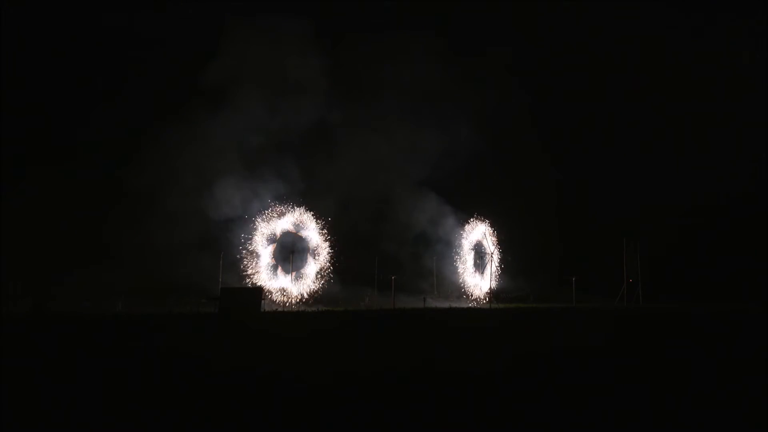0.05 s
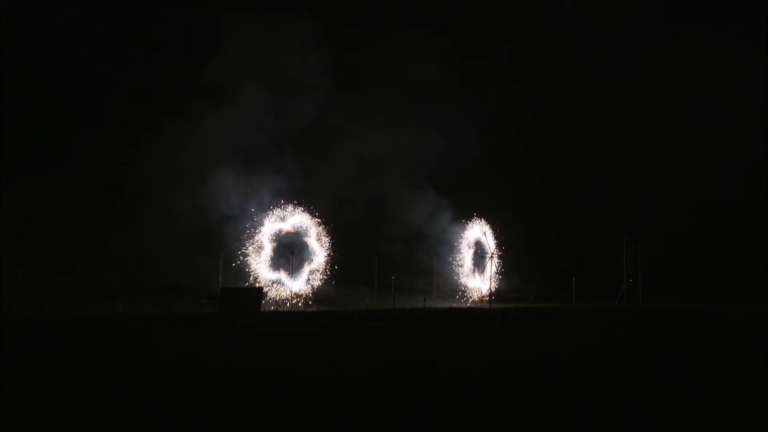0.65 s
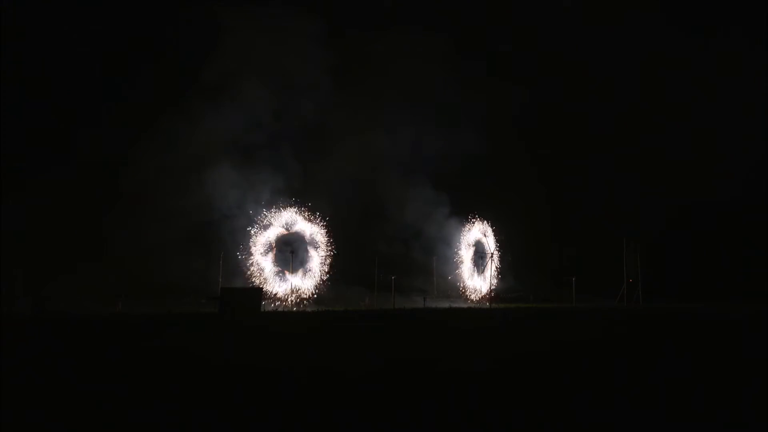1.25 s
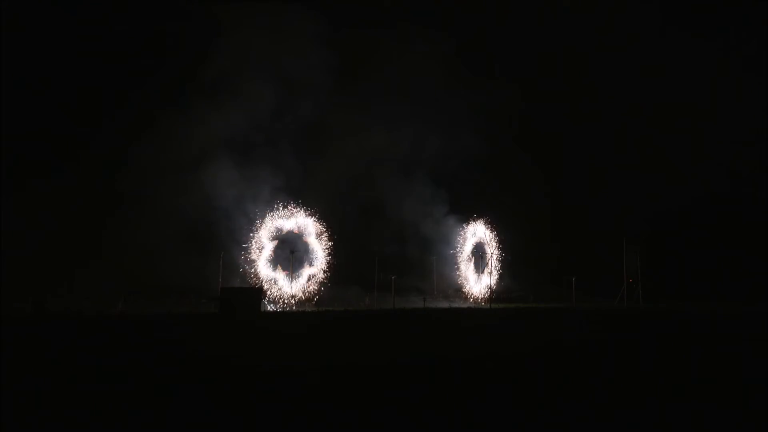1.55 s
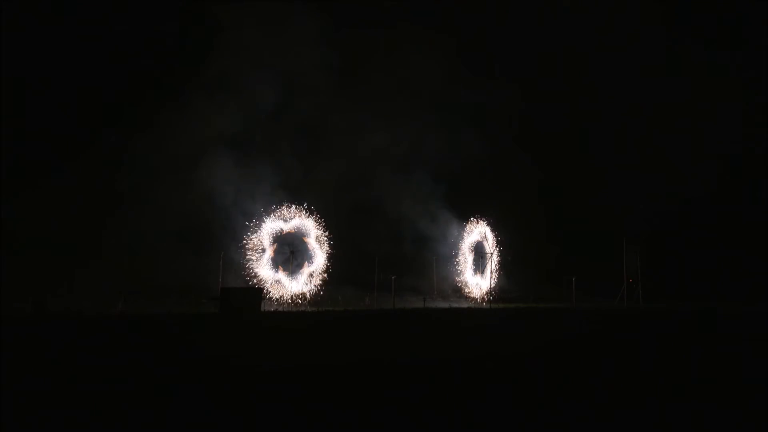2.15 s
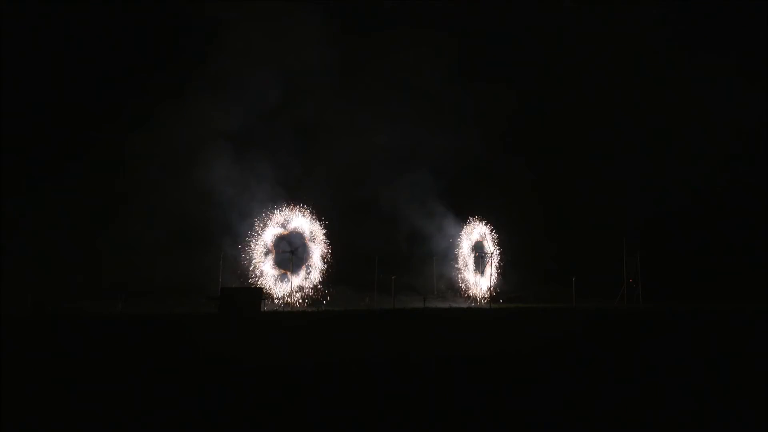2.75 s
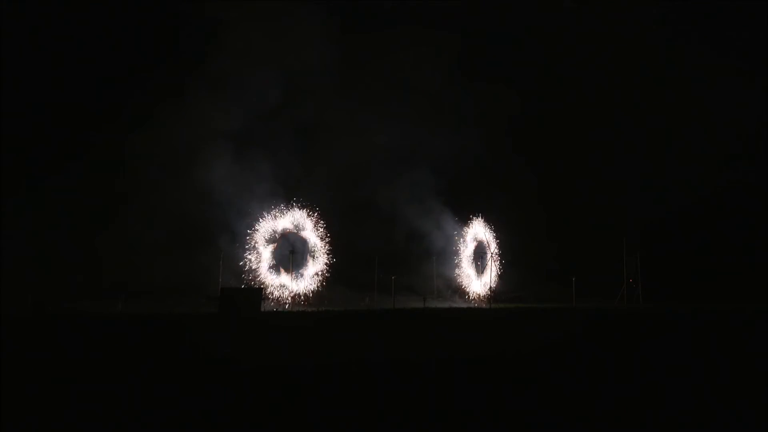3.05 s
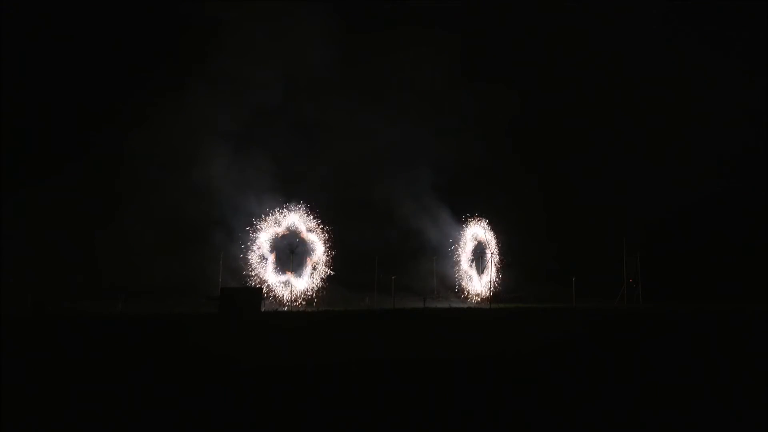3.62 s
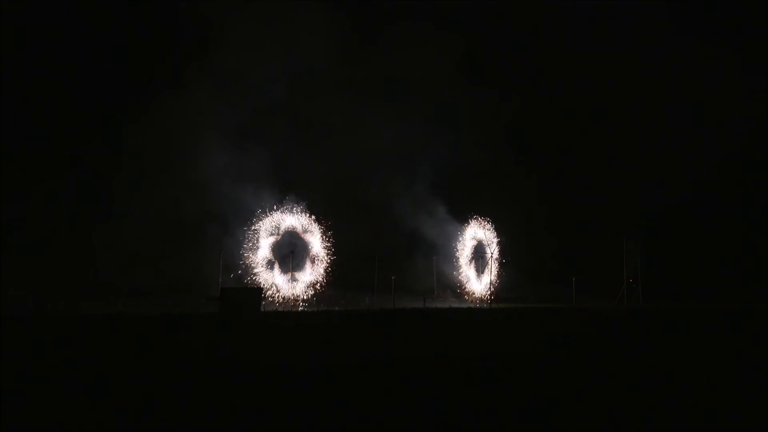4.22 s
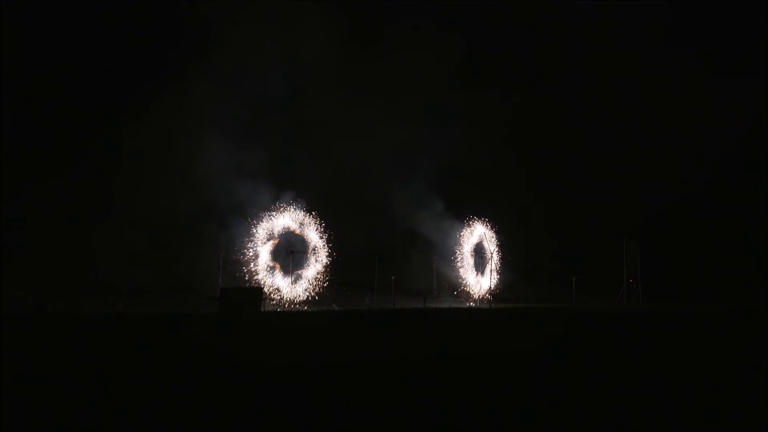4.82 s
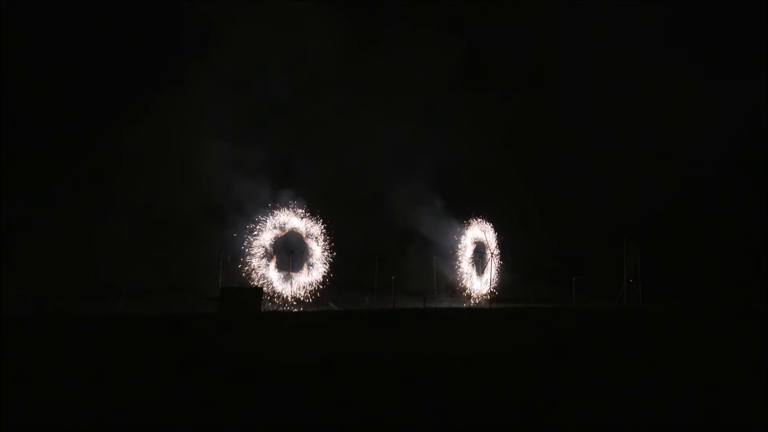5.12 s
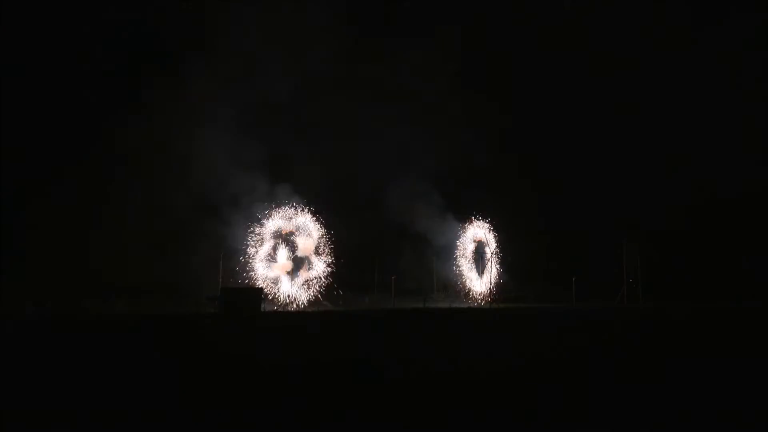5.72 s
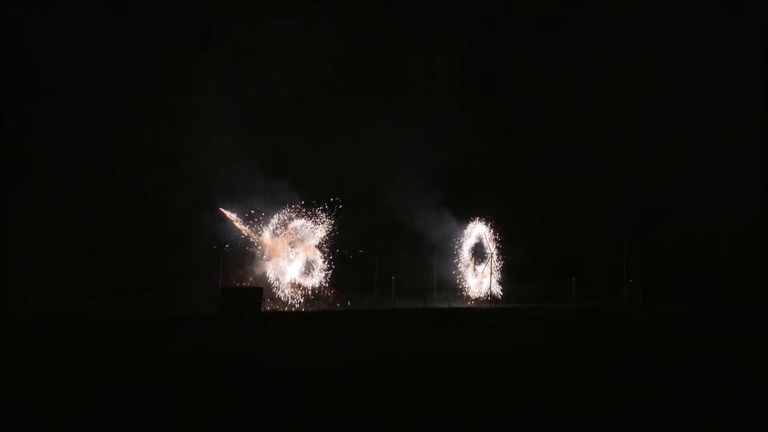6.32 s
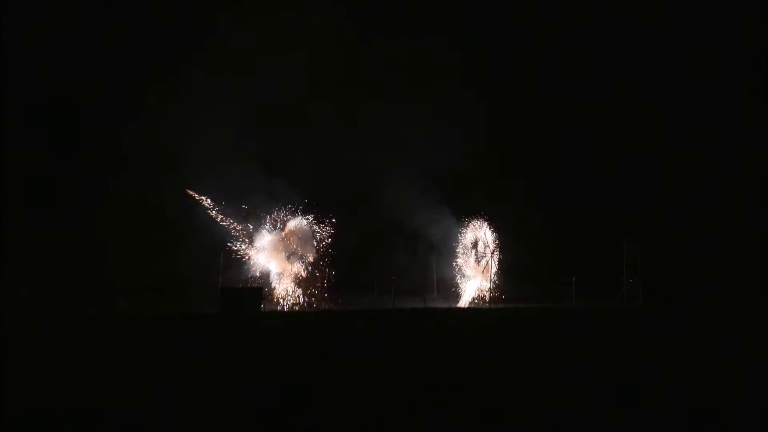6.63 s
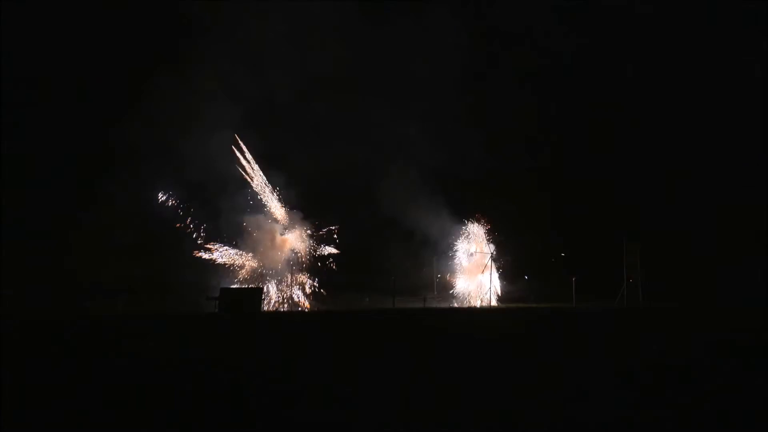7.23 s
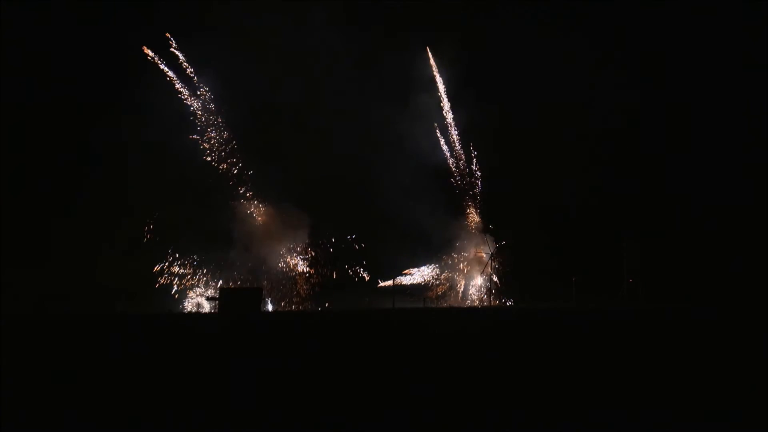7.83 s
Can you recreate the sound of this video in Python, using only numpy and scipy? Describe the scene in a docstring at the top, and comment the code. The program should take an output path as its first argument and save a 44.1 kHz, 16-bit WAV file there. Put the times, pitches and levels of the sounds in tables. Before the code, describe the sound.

Spinning firework wheels hiss and fizz with occasional sharp pops, then burst into a rapid run of loud, distorted bangs and cracks.

```python
"""In an open field at night, two firework wheels spin. Their gas jets hiss and fizz, with an odd sharp pop.
Then their charges go off: bangs, cracks, spurting comets and sputtering stars (burning pellets),
while the surroundings throw back a low rumble.
The bangs overload the single microphone, which feeds only the left channel."""
import sys
import numpy as np
from scipy import signal
from scipy.fft import rfft, irfft
from scipy.io import wavfile
from scipy.ndimage import uniform_filter1d

SR = 44100
rng = np.random.default_rng(int(sys.argv[2]) if len(sys.argv) > 2 else 0)


def transcribe(u):
    """Save the signal u as a 16-bit wav file named by the first command-line argument.

    u: samples, shape (n,) or (channels, n), limited to [-1, 1]; the rate is SR.
    q: integer samples, one column per channel.
    """
    v = np.clip(np.atleast_2d(u).T, -1, 1)
    q = np.round(v * 32767).astype(np.int16)
    wavfile.write(sys.argv[1], SR, q)


N = 347067
T = np.arange(N) / SR

# tone of rasping gas, also used for stars and scattered sound: (frequency [Hz], level [dB])
RASP_COLOUR = [(200, 1.5), (550, -9.5), (850, -5.5), (1300, -1.5), (1800, -1.5), (2900, -2.5),
               (4000, -10.5), (5800, -12.5), (8500, -23.5), (12000, -31.5), (15500, -75)]
# bursting charges: (time [s], blast level [dB], ring pitch [Hz], relative tearing level [dB],
# blast length [s], microphone recovery time [s], echo level [dB])
BANGS = [(5.8815, 7.5, 198, -1, 0.0043, 0.073, -17.5), (5.9217, 6, 430, -0.5, 0.0052, 0.02, -25.5),
         (6.171, 2, 455, -7, 0.0053, 0.049, -21), (6.3208, -4.5, 370, 4, 0.0062, 0.051, -24),
         (6.4413, -1.5, 470, 0, 0.0049, 0.011, -22), (6.6076, 8, 468, -5, 0.0039, 0.014, -25.5),
         (6.7185, -4, 420, 5.5, 0.0036, 0.0071, -28.5), (6.8108, 9, 460, -3.5, 0.0029, 0.0062, -30),
         (7.043, -2.5, 463, 5, 0.0063, 0.0055, -19.5), (7.1184, 0.5, 391, 3.5, 0.0048, 0.0082, -24),
         (7.2706, 1.5, 437, -1.5, 0.0053, 0.011, -38), (7.3536, 3.5, 460, -6, 0.004, 0.0047, -51),
         (7.413, -3.5, 420, -4.5, 0.0053, 0.0061, -41), (7.4763, 3.5, 490, -3.5, 0.0035, 0.0072, -28),
         (7.5212, 4, 445, -1, 0.0033, .009, -30.5), (7.6066, 2, 436, 1.5, 0.0037, 0.013, -33),
         (7.6506, 7, 440, 5.5, 0.0023, .011, -32)]
FIRST_BANG_S, LAST_BANG_S = BANGS[0][0], BANGS[-1][0]


def undb(db):
    """Turn decibels into a factor to multiply by."""
    return 10 ** (np.asarray(db) / 20)


def unit(x):
    """Scale a sound to an average (rms) level of 1."""
    return x / np.sqrt(np.mean(x ** 2))


def response(colour, size=4096):
    """What a click becomes after a filter shaped by (frequency [Hz], level [dB]) points."""
    hz, db = np.transpose(colour)
    bins = np.maximum(np.fft.rfftfreq(size, 1 / SR), 1)
    gain = undb(np.interp(np.log(bins), np.log(hz), db))
    # fold the second half onto the first, so nothing sounds before the click
    cepstrum = irfft(np.log(gain))
    cepstrum[1:size // 2] *= 2
    cepstrum[size // 2 + 1:] = 0
    return irfft(np.exp(rfft(cepstrum)))


def ring(x, kernel):
    """Filter a sound: every sample sets off a copy of the kernel."""
    return signal.fftconvolve(x, kernel)[:len(x)]


def noise(colour):
    """Steady noise with the given tone colour, at level 1."""
    return unit(ring(rng.standard_normal(N), response(colour)))


def wander(rate):
    """A smooth random curve of size about 1 that takes `rate` new values a second."""
    hold = int(SR / rate)
    steps = np.repeat(rng.standard_normal(N // hold + 1), hold)
    return unit(uniform_filter1d(uniform_filter1d(steps, hold), hold)[:N])


def sparks(colour, per_s, spread_db):
    """Sparks tick at random times: many small, a few large."""
    size = undb(spread_db * np.minimum(rng.exponential(size=N), 4))
    ticks = (rng.random(N) < per_s / SR) * size * rng.choice([-1, 1], N)
    return unit(ring(ticks, response(colour)))


def ping(hz, fade_s):
    """A sudden jump in pressure starts a vibration that drops 60 dB in fade_s."""
    t = T[:SR // 20]
    return np.cos(2 * np.pi * hz * t) * np.exp(-np.log(1000) * t / fade_s)


def add(out, s, sound):
    """Mix a sound in at s seconds."""
    i = int(s * SR)
    out[i:i + len(sound)] += sound[:N - i]


def since(s):
    """Seconds gone by since time s; 0 before it."""
    return np.maximum(T - s, 0)


def echoes():
    """The field scatters a brief bright tail behind each bang; later dull echoes merge into a rumble."""
    # tone of the late echoes: (frequency [Hz], level [dB])
    rumble_colour = [(25, -8), (55, -17.5), (100, -4.5), (140, -2), (185, 2.5), (240, -0.5), (320, -5),
                     (420, -15.5), (600, -26), (1200, -56)]
    delay_s, rise_s, fade_s = 0.016, 0.025, 2.65
    tails, power = np.zeros(N), np.zeros(N)
    swell = (1 - np.exp(-(T / rise_s) ** 2)) * undb(-60 * T / fade_s)
    for s, *_, echo_db in BANGS:
        add(tails, s, np.exp(-T[:SR // 4] / 0.015))
        add(power, s + delay_s, (undb(echo_db) * swell) ** 2)
    rumble = noise(rumble_colour) * undb(1.1 * wander(rate=50))
    return rumble * np.sqrt(power) + undb(-20.5) * tails * noise(RASP_COLOUR)


def stars():
    """Stars light at the first bang, roar and sputter as they burn down, and fade faster after the last."""
    level_db, rise_s, sag_db_per_s, dying_db_per_s = -29, 0.011, 3, 7
    age, dying = since(FIRST_BANG_S), since(LAST_BANG_S)
    burn = (1 - np.exp(-age / rise_s)) * undb(level_db - sag_db_per_s * age - dying_db_per_s * dying)
    sputter = sparks(RASP_COLOUR, per_s=400, spread_db=4)
    roar = noise(RASP_COLOUR) * undb(2.36 * wander(rate=90))
    return burn * (undb(-1) * roar + undb(-5) * sputter)


def jets():
    """Swirling gas hisses, sparks fizz in it, and the flames drone with a hum that swells and fades."""
    # tone of the gas; the bounce off the grass cuts it near 700 Hz: (frequency [Hz], level [dB])
    jet_colour = [(300, -6), (700, -8.5), (1250, -1), (1700, -0.5), (2500, 0), (3600, -6), (5000, -2.5),
                  (7000, -7.5), (9000, -13.5), (12000, -20.5), (16000, -35)]
    # tone of the flames' low drone: (frequency [Hz], level [dB])
    drone_colour = [(20, -29), (40, -11), (65, -1), (100, 0), (135, -1), (170, -6.5), (250, -11.5),
                    (450, -19), (900, -42.5)]
    # tone of the hum, one narrow peak: (frequency [Hz], level [dB])
    hum_colour = [(60, -41), (115, -10), (134, 10.5), (155, -10), (300, -50)]
    # moments when the hum grows louder: (time [s], width [s], level [dB])
    hum_swells = [(2.18, 0.15, -48), (2.82, 0.24, -46)]
    hiss = noise(jet_colour) * undb(0.25 * wander(rate=23))
    fizz = sparks(jet_colour, per_s=900, spread_db=3)
    drone = noise(drone_colour) * undb(0.38 * wander(rate=13))
    swells = sum(undb(db) * np.exp(-((T - s) / width) ** 2) for s, width, db in hum_swells)
    hum = noise(hum_colour) * (undb(-62.5) + swells)
    # the hiss is steady until the first bang, then ducks to a whisper
    hiss_db = np.interp(since(FIRST_BANG_S), [0, 0.18], [-36, -54])
    return (undb(-1) * hiss + undb(-10) * fizz + undb(-8) * drone) * undb(hiss_db) + hum


def spurts():
    """Each comet leaves its tube with a short rasp of gas."""
    # comet launches: (time [s], length [s], level [dB])
    comets = [(5.924, 0.015, -19), (6.094, .016, -22), (6.137, 0.019, -22), (6.236, 0.0065, -24),
              (6.384, 0.016, -24), (6.54, 0.012, -27), (6.662, 0.0095, -25.5), (6.7825, 0.0095, -23),
              (6.936, .013, -27), (6.989, 0.0043, -21.5), (7.216, .007, -24.5), (7.585, .007, -25),
              (7.698, 0.022, -29.5), (7.784, .005, -31), (7.827, 0.0047, -25), (7.848, 0.0054, -28)]
    rise_s, fall_s = 0.00052, 0.0036
    loudness = np.zeros(N)
    t = T[:SR // 8]
    for s, length, db in comets:
        fall = np.exp(-np.maximum(t - length, 0) / fall_s)
        add(loudness, s, undb(db) * (1 - np.exp(-t / rise_s)) * fall)
    return loudness * noise(RASP_COLOUR)


def cracks():
    """Small charges go off: a bright snap and a low knock, with a short scatter behind them."""
    # the main pops and cracks: (time [s], level [dB], snap pitch [Hz], knock relative to snap [dB])
    main_cracks = [(0.2356, -9.5, 2720, -9), (1.2412, -4.5, 2570, -9), (1.4421, -17, 3000, -10),
                   (2.1697, -11, 3270, -29), (4.3336, -6, 3050, -17), (5.0213, -9.5, 3320, -9),
                   (5.287, -6.5, 3430, -11.5), (5.914, -5, 2800, -3), (5.939, -4, 2600, -4),
                   (5.949, -7.5, 2220, 3), (5.986, -12.5, 2580, 9), (6.1829, -3, 2640, -1),
                   (6.343, -2, 2640, -3), (6.3874, -16, 2500, -8), (6.634, -18, 2400, -7),
                   (6.9877, -8, 1770, -27), (7.0567, -7, 2400, -3), (7.0931, -6.5, 1900, -3.5),
                   (7.2977, -7, 2320, -2), (7.6, -10, 2200, -16), (7.785, -7, 1870, -22),
                   (7.8436, -3, 1850, -19)]
    # the grass cancels a crack's middle tones, the air dulls its top: (frequency [Hz], level [dB])
    crack_colour = [(60, -3), (300, 2), (500, -2), (800, -14.5), (1400, 5), (2400, 0.5), (4000, -3.5),
                    (6000, -3), (9000, -8), (16000, -36)]
    knock = ping(hz=330, fade_s=0.0053)
    scatter = undb(-28) * noise(RASP_COLOUR) * np.exp(-T / 0.005)
    # lesser cracks come at random among the burning stars
    lesser_per_s = 22
    fires = (rng.random(N) < lesser_per_s / SR) & (T > FIRST_BANG_S)
    sizes_db = -19 + 3 * rng.standard_normal(N)
    lesser_cracks = [(s, db, 2370, -0.5) for s, db in zip(T[fires], sizes_db[fires])]
    pops, spikes = np.zeros(N), np.zeros(N)
    for s, db, snap_hz, knock_db in main_cracks + lesser_cracks:
        snap = ping(snap_hz, fade_s=0.0021)
        add(pops, s, undb(db) * (snap + undb(knock_db) * knock))
        add(spikes, s, undb([db]))
    return ring(pops, response(crack_colour)) + ring(spikes, scatter)


def bangs():
    """A charge bursts: a sharp shock, then a tearing, distorted blast with a low ring."""
    # tone of the tearing noise: (frequency [Hz], level [dB])
    tear_colour = [(50, 0), (200, 4.5), (450, 6.5), (900, -3.5), (1600, -1), (3000, -11.5), (6000, -13.5),
                   (15000, -20.5)]
    # tone of the shock front: (frequency [Hz], level [dB])
    shock_colour = [(300, -6), (1200, 6), (2500, 4), (5000, -8.5), (10000, -9), (16000, -7)]
    thump_hz, shock_s, offset_rise_s = 163, 0.00079, 0.00063
    blasts, offset = np.zeros(N), np.zeros(N)
    t = T[:SR // 4]
    tear, shock = noise(tear_colour), noise(shock_colour)
    thump = 0.64 + 0.5 * np.cos(2 * np.pi * thump_hz * t)  # shared by all blasts
    for s, db, ring_hz, tear_db, length, recovery_s, _ in BANGS:
        i = int(s * SR)
        front = undb(6.5) * np.roll(shock, -i)[:len(t)] * np.exp(-(t / shock_s) ** 2)
        hold = np.exp(-(t / (1.23 * length)) ** 4)  # stays level, then stops quickly
        tearing = undb(tear_db - 3) * np.roll(tear, -i)[:len(t)] * hold
        low_ring = (thump + 0.97 * np.cos(2 * np.pi * ring_hz * t)) * np.exp(-(t / length) ** 2)
        add(blasts, s, undb(db) * (front + low_ring + tearing))
        add(offset, s, 0.36 * (1 - np.exp(-t / offset_rise_s)) * np.exp(-(t / recovery_s) ** 2))
    # the overloaded microphone's offset (resting level) jumps after each bang,
    # then dips below zero as it recovers
    return blasts + signal.sosfilt(signal.butter(1, 3, "high", fs=SR, output="sos"), offset)


def scene():
    """Everything as it reaches the one microphone."""
    return (jets() + cracks() + spurts() + bangs() + echoes() + stars()) * np.ones((2, 1))


def record(dry):
    """The left amplifier chops off loud peaks and overshoots at the edges; the right has only faint hiss."""
    ceiling, top_hz = 0.65, 16200
    clipped = np.clip(undb(5) * dry[0], -ceiling, ceiling)
    left = clipped + 0.0073 * np.diff(clipped, prepend=0)
    right = undb(-87) * rng.standard_normal(N)
    treble_cut = signal.ellip(8, 0.2, 70, top_hz, fs=SR, output="sos")
    return signal.sosfilt(treble_cut, np.array([left, right]))


dry = scene()
out = record(dry)
transcribe(out)
```